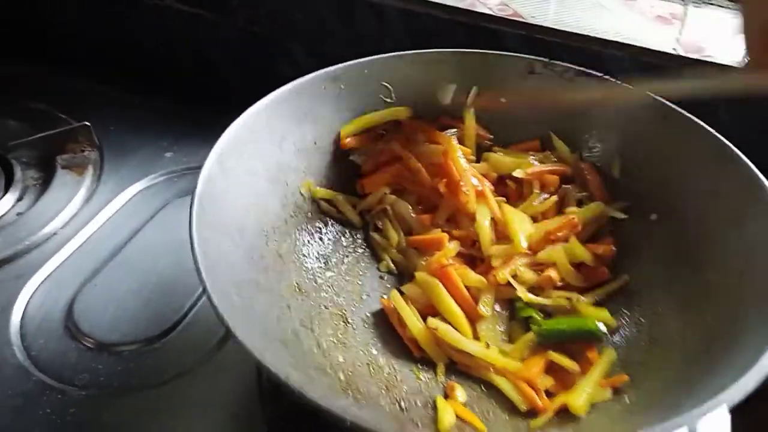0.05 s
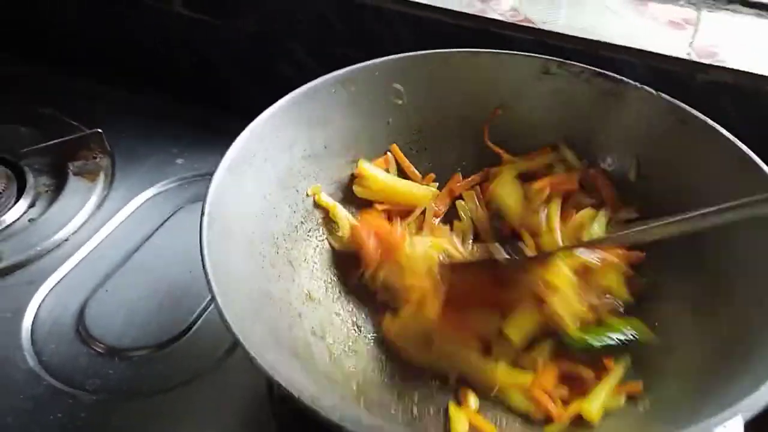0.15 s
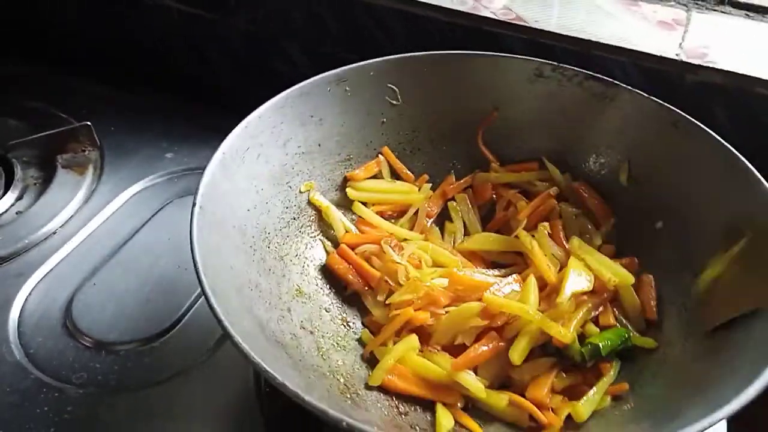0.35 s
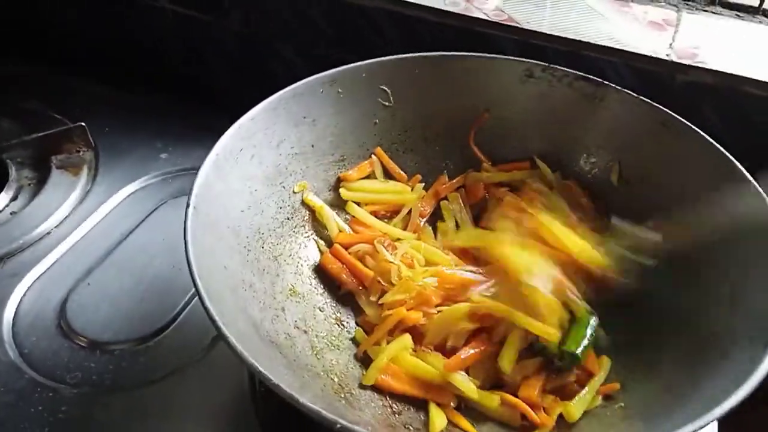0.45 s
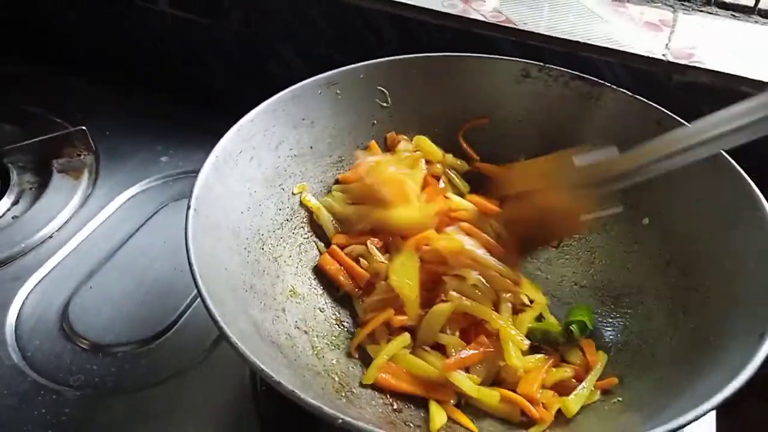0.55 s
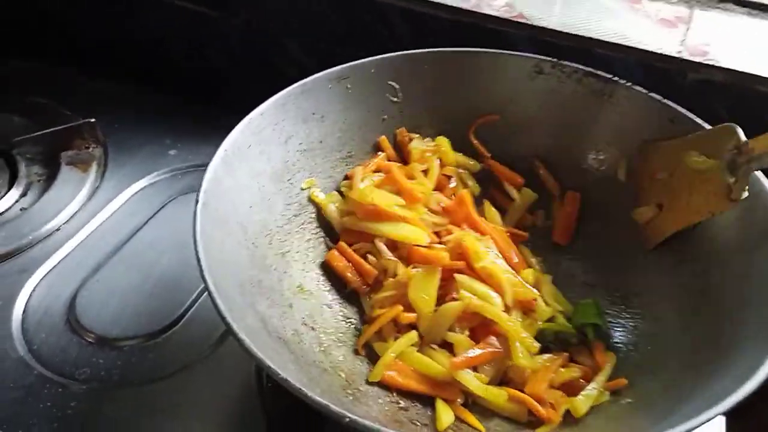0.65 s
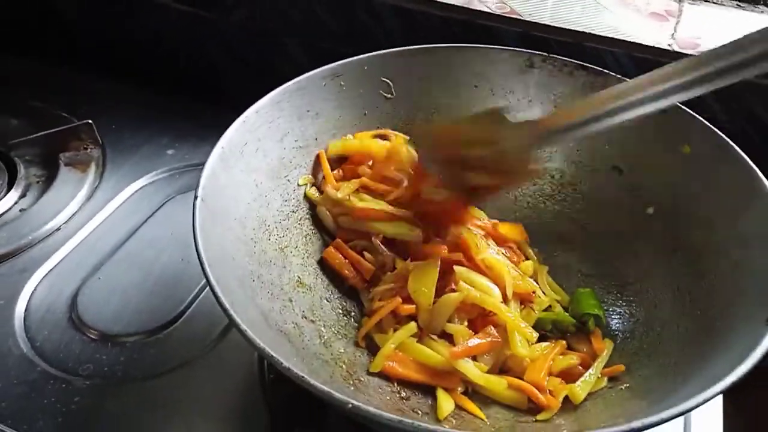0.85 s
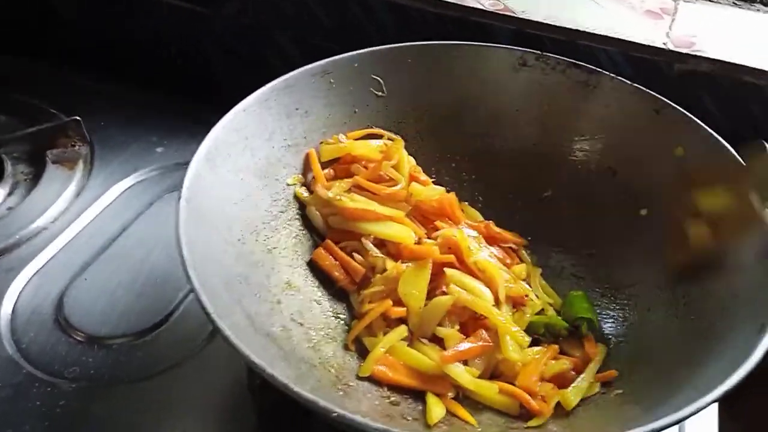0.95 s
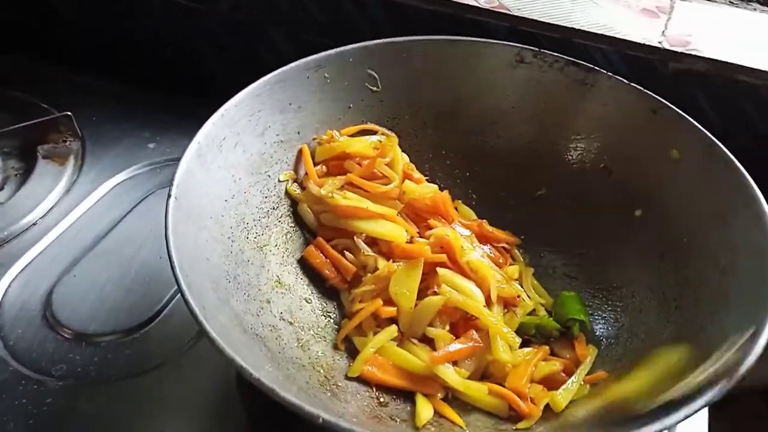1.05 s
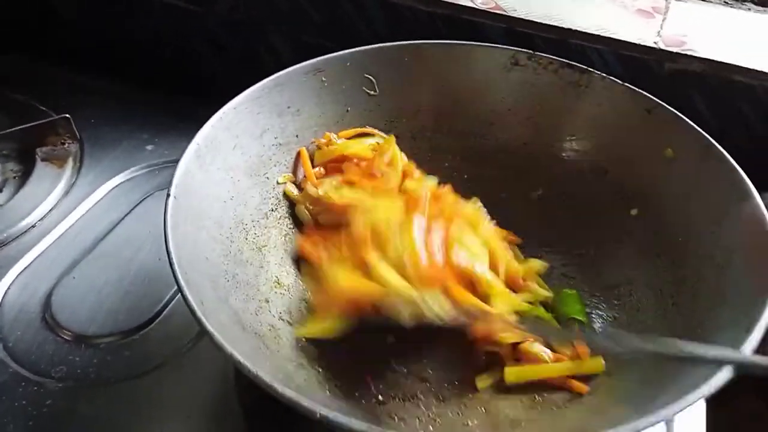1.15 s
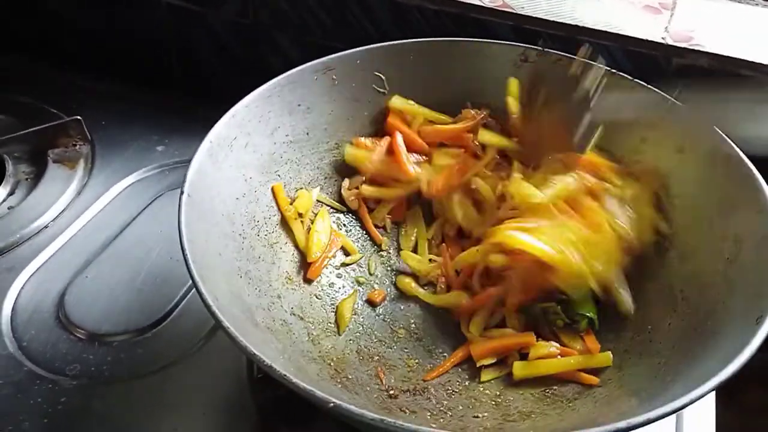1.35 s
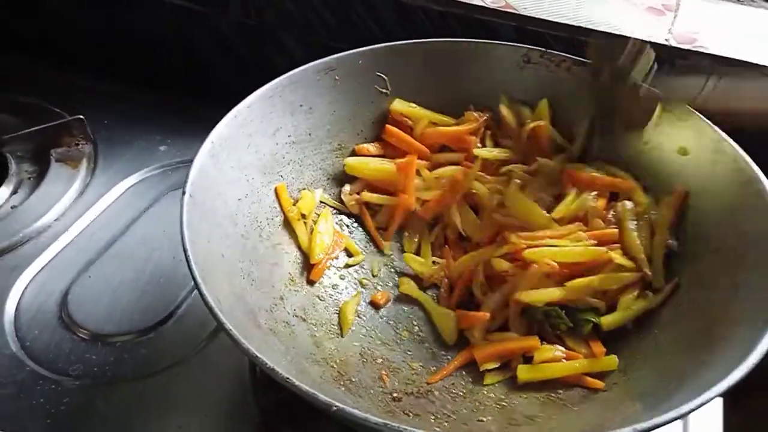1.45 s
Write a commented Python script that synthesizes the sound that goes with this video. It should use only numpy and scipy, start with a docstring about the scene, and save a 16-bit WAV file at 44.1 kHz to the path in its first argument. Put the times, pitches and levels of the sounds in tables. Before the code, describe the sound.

A steel spatula scrapes hard through vegetables in a metal wok, the pan rings briefly, then a sharp clink and a lighter second scrape follow over faint sizzling, close up in a small kitchen.

```python
"""A small kitchen, close to a wok: a steel spatula turns vegetables over a faint sizzle of oil.
Two scooping strokes scrape along the pan: grains of noise drive its body, a mid rasp and treble grit.
Each stroke opens with a metallic scritch. Light slides make the blade zing, taps clink and ring,
soft blows thud through the wok's resonances, and the uncovered pan sings in short damped notes."""
import sys
import numpy as np
from scipy import signal
from scipy.fft import rfft, irfft
from scipy.io import wavfile
from scipy.ndimage import map_coordinates

SR = 44100
rng = np.random.default_rng(int(sys.argv[2]) if len(sys.argv) > 2 else 0)


def transcribe(u):
    """Save the signal u as a 16-bit wav file named by the first command-line argument.

    u: samples, shape (n,) or (channels, n), limited to [-1, 1]; the rate is SR.
    q: integer samples, one column per channel.
    """
    v = np.clip(np.atleast_2d(u).T, -1, 1)
    q = np.round(v * 32767).astype(np.int16)
    wavfile.write(sys.argv[1], SR, q)


N = 66150  # samples, 1.5 s


def amp(db):
    """Decibels to linear gain."""
    return 10 ** (np.asarray(db) / 20)


def unit(x):
    """Scale a signal to rms 1."""
    return x / np.sqrt(np.mean(x ** 2) + 1e-20)


def clock():
    """The time of each sample in seconds."""
    return np.arange(N) / SR


def decay(t, t60):
    """Exponential fade that falls 60 dB in t60 seconds."""
    return np.exp(-np.log(1000) * t / t60)


def along(points, hz):
    """Interpolate (Hz, value) points on a log frequency axis."""
    point_hz, values = np.transpose(points)
    return np.interp(np.log(hz + 1), np.log(point_hz + 1), values)


def grid():
    """Frequencies of the filter grid in Hz."""
    return np.fft.rfftfreq(2 * N, 1 / SR)


def filtered(x, response):
    """Pass a zero-padded signal through a frequency response."""
    return irfft(rfft(x, 2 * N) * response, 2 * N)[..., :N]


def even(response):
    """Scale a response so that white noise keeps its power."""
    return response / np.sqrt(np.mean(np.abs(response) ** 2))


def colour(points):
    """Tone curve through (Hz, dB) points, made causal by folding its cepstrum (minimum phase)."""
    cepstrum = irfft(np.log(amp(along(points, grid()))))
    return even(np.exp(rfft(2 * cepstrum[:N], 2 * N) - cepstrum[0]))


def resonances(rows):
    """Sum of second-order resonances, each with a centre, a width and a peak level."""
    f = grid()
    total = 0
    for centre, width, db in rows:
        total = total + amp(db) * 1j * f * width / (centre * centre - f * f + 1j * f * width)
    return total


def grains(rate, spread_db):
    """Random tiny impulses, rate a second on average, of uneven size and either sign, rms 1."""
    struck = rng.random(N) < rate / SR
    sign = rng.choice([-1, 1], N)
    size = amp(spread_db * np.clip(rng.standard_normal(N), -2, 2))
    return unit(struck * sign * size)


def wobble(rate):
    """A smooth random curve with rate knots a second."""
    return map_coordinates(rng.standard_normal(1024), [clock() * rate], mode="wrap")


def burst(s, rise, t60):
    """Envelope with a Gaussian swell up to time s and an exponential fade after it."""
    t = clock() - s
    swell = np.exp(-(np.minimum(t, 0) / rise) ** 2)
    return swell * decay(np.maximum(t, 0), t60)


def ring(s, modes, attack):
    """Damped sines that start at time s, each level varied at random by about 1 dB."""
    t = np.maximum(clock() - s, 0)
    total = 0
    for hz, db, t60 in modes:
        total = total + amp(db + rng.normal()) * decay(t, t60) * np.sin(2 * np.pi * hz * t)
    return (1 - np.exp(-t / attack)) * total


def rubbed(modes, rough):
    """Modes kept sounding by friction; the wider one is, the faster it wavers in phase and level."""
    total = 0
    for hz, width, db in modes:
        level = amp(db + 2.5 * wobble(5 * width))
        phase = 2 * np.pi * (hz * clock() + rng.random()) + rough * wobble(5 * width)
        total = total + level * np.sin(phase)
    return unit(total)


# Resonances of the loaded wok. Each row: centre in Hz, width in Hz, peak level in dB.
WOK_RESONANCES = [(303.7, 30, -2), (323.5, 29, -7.5), (476.7, 24, -3), (762.4, 14, 7.5), (1087, 35, -8),
                  (1190, 28, -1.5), (1516, 33, -5.5), (1760, 61, 6), (2196, 34, -1.5), (2567, 68, 3.5),
                  (3900, 66, -19), (4850, 190, -10), (5310, 90, -7)]


def wok(spectrum, plain_db):
    """The pan's resonances over its plain response, under the colour of the contact."""
    return even(colour(spectrum) * (amp(plain_db) + resonances(WOK_RESONANCES)))


# Tone curves of the frying, of the low rush, and of a faint high hiss that differs between
# left and right. Each row: frequency in Hz, level in dB.
SIZZLE_COLOUR = [(600, -16), (1100, -24), (1600, -8), (2050, -1), (2700, -1), (3600, -2.5), (4450, -10.5),
                 (5400, -1.5), (7200, 3), (8600, -6), (11000, -8.5), (12200, -18.5), (13600, -25),
                 (15000, 2.5), (15800, -2)]
RUSH_COLOUR = [(25, -29), (60, -17.5), (110, -7), (190, -0.5), (250, -7), (310, -2.5), (480, -3),
               (650, -8.5), (1400, -10.5), (2200, -22)]
WIDE_HISS_COLOUR = [(3000, -44), (4000, -28), (4600, -15), (5500, -30), (8000, -30), (9500, -3),
                    (11000, 1.5), (13600, 0), (14600, -2), (15800, -4)]


def sizzle():
    """Bubbles burst in the oil, as pops over noise, with the low rush of stove and room and a wide hiss."""
    frying = unit(rng.standard_normal(N) + amp(-3) * grains(900, spread_db=5))
    flicker = amp(-54.5 + 1.45 * wobble(15.14))
    oil = flicker * filtered(frying, colour(SIZZLE_COLOUR))
    rush = amp(-61.5) * filtered(rng.standard_normal(N), colour(RUSH_COLOUR))
    centre = oil + rush
    # opposite sign in left and right
    wide_hiss = amp(-70.5) * filtered(rng.standard_normal(N), colour(WIDE_HISS_COLOUR))
    return np.array([centre + wide_hiss, centre - wide_hiss])


# How long the room rings. Each row: frequency in Hz, t60 in seconds.
ROOM_DECAY = [(200, 0.45), (2000, 0.23), (12000, 0.22)]


def kitchen(x):
    """The small room's short tail: noise that fades at its own rate in each band, 5 ms late."""
    hz, t, noise = signal.stft(rng.standard_normal(SR // 2), SR, nperseg=256)
    fade = decay(t, along(ROOM_DECAY, hz)[:, None])
    tail = signal.istft(noise * fade, SR)[1]
    delayed = np.pad(x, (SR // 200, 0))
    return signal.fftconvolve(delayed, tail / np.linalg.norm(tail))[:N]


# Notes of the pan as the food lifts. Each row: start in seconds, pitch in Hz, level in dB, t60 in seconds.
SUNG_NOTES = [(0.101, 184, -47.5, 0.14), (0.10, 872, -43, 0.053), (0.135, 1000, -55, 0.37),
              (0.418, 848.5, -36.5, 0.22), (0.422, 1098, -37.5, 0.18), (0.453, 1153, -39, 0.17),
              (0.512, 1251, -51, 0.22), (0.545, 790, -49, 0.31), (1.206, 1800, -38, .07)]


def pan_notes():
    """The uncovered pan sings briefly, each damped note smeared by the moving food."""
    out = np.zeros(N)
    for s, hz, db, t60 in SUNG_NOTES:
        note = ring(s, [(hz, db, t60)], attack=0.005)
        smear = 0.7 + 0.7 * wobble(75)
        out += note * smear
    return out


# Soft blows of blade and vegetables. Each row: peak in seconds, level in dB, t60 in seconds.
SOFT_BLOWS = [(0.098, -55.5, 0.42), (0.216, -29, 0.093), (0.2582, -33.5, 0.042), (0.689, -54, 0.59),
              (0.851, -50.5, 0.22), (1.006, -52.5, 0.42), (1.157, -40, 0.035), (1.236, -36.5, 0.084)]
# Tone curve of a soft blow. Each row: frequency in Hz, level in dB.
BLOW_COLOUR = [(40, -36.5), (150, -13.5), (290, 5.5), (450, -6), (800, -5.5), (1800, -14), (4000, -20),
               (10000, -35.5)]


def thuds():
    """Each soft blow is a dying cluster of contacts on the damped pan."""
    force = np.zeros(N)
    for s, db, t60 in SOFT_BLOWS:
        force += amp(db) * burst(s, rise=0.00053, t60=t60)
    return filtered(force * grains(3000, spread_db=0.5), wok(BLOW_COLOUR, plain_db=-4))


# Tone curve of the edge's hiss on steel, for taps and skims. Each row: frequency in Hz, level in dB.
EDGE_COLOUR = [(300, -7), (1500, -17), (3000, -0.5), (4300, -11.5), (5000, 0.5), (6000, 4), (8000, -3),
               (9500, -1), (10500, -7.5), (11700, -29), (13000, -8), (13700, -9), (14600, -1), (16000, -17)]
# Steel on steel. Each row: start in seconds, then clink, chatter and long ring levels in dB.
STEEL_TAPS = [(0.53, -46, -56.5, -54.5), (0.6791, -30, -54, -45), (1.0006, -25, -34.5, -60),
              (1.0132, -43, -43.5, -66), (1.10, -46, -51, -46.5), (1.478, -46.5, -58, -68)]
# The clink and the spatula's long ring. Each row: pitch in Hz, level in dB, t60 in seconds.
CLINK_MODES = [(3140, 0.5, 0.018), (2830, -6.5, 0.01), (3700, -34, 0.022), (5950, -18, 0.014)]
SPATULA_MODES = [(1426, -9.5, 0.28), (1974, -21, 0.72), (2686, -7, 0.59), (3406, -1, 0.22),
                 (4280, -12, 0.22)]
# Modes of the chatter. Each row: pitch in Hz, width in Hz, level in dB.
CHATTER_MODES = [(3280, 140, -2), (4820, 82, 2), (5900, 83, 8), (6400, 60, -7), (7760, 23, 5),
                 (8920, 37, 9.5), (9840, 51, 6.5), (10200, 47, -1), (12500, 51, 0), (14650, 130, -5)]
# Tone curve of the first instant of contact. Each row: frequency in Hz, level in dB.
CRACK_COLOUR = [(500, -33), (2500, -12), (5500, -7), (15000, -1)]


def taps():
    """A hard contact cracks and clinks, chatters briefly and leaves the spatula ringing."""
    rattling = amp(-3) * rubbed(CHATTER_MODES, rough=0.4)
    edge_hiss = amp(-0.5) * filtered(grains(10000, spread_db=5), colour(EDGE_COLOUR))
    chatter = rattling + edge_hiss
    crack = amp(-8) * unit(filtered(rng.standard_normal(N), colour(CRACK_COLOUR)))
    out = np.zeros(N)
    for s, clink_db, chatter_db, ring_db in STEEL_TAPS:
        out += amp(clink_db) * ring(s, CLINK_MODES, attack=0.00041)
        out += amp(ring_db) * ring(s, SPATULA_MODES, attack=0.0024) * amp(3 * wobble(120))
        rattle = burst(s, rise=0.00041, t60=0.075) * chatter
        snap = burst(s, rise=0.00032, t60=0.0045) * crack
        out += amp(chatter_db) * (rattle + snap)
    return out


# Light slides on the wok wall. Each row: peak in seconds, rise in seconds, t60 in seconds,
# then free blade ring, pressed blade ring and hiss levels in dB.
LIGHT_SLIDES = [(0.423, 0.0087, 0.12, -32.5, -54, -41.5), (0.814, 0.011, .12, -52, -41.5, -43)]
# Blade modes, free and pressed on the wall. Each row: pitch in Hz, width in Hz, level in dB.
FREE_BLADE = [(3403, 9.3, -13.5), (4260, 13, -13.5), (6140, 19.7, 0), (6600, 17, -10), (7060, 18, -4.5),
              (8935, 18, -9), (9570, 30, -9), (9840, 20, -6.5), (13300, 76, -18), (14620, 91, -10),
              (15200, 50, -16)]
PRESSED_BLADE = [(2682, 120, -9), (4820, 74, -3), (5510, 57, 9), (5680, 50, 3), (5600, 24, -20),
                 (6560, 14, 8), (7050, 23, 6.5), (7720, 70, 3), (8700, 51, -4), (8800, 50, -20),
                 (9040, 39, -19)]


def skims():
    """The edge slides lightly on bare steel: friction keeps the blade zinging over a grainy hiss."""
    out = np.zeros(N)
    for s, rise, t60, free_db, pressed_db, hiss_db in LIGHT_SLIDES:
        contact = burst(s, rise, t60)
        free = amp(free_db) * rubbed(FREE_BLADE, rough=0.85)
        pressed = amp(pressed_db) * rubbed(PRESSED_BLADE, rough=0.6)
        out += contact * (free + pressed)
        out += filtered(contact * grains(8000, spread_db=-1), amp(hiss_db) * colour(EDGE_COLOUR))
    return out


# The edge bites into the pan. Each row: peak in seconds, rise in seconds, t60 in seconds, level in dB.
EDGE_BITES = [(0.216, 0.008, 0.15, -36.5), (1.107, 0.015, 0.17, -39)]
# Resonances of the scritch. Each row: centre in Hz, width in Hz, peak level in dB.
SCRITCH_MODES = [(2153, 33, 2), (2708, 54, 2.5), (3670, 80, 1.5), (3805, 43, 5), (6390, 52, 7),
                 (6520, 57, 3), (6990, 58, 13), (7450, 49, 7.5), (7750, 31, 3), (8930, 23, 0),
                 (10000, 30, -19), (10800, 19, -23)]
# The scritch's treble roll-off. Each row: frequency in Hz, level in dB.
SCRITCH_COLOUR = [(1000, -8), (2000, 5.5), (8000, -1.5), (11000, -1.5), (12000, -13), (14000, -13)]


def bites():
    """Each stroke opens with a metallic scritch as grainy force sets resonances chattering."""
    force = np.zeros(N)
    for s, rise, t60, db in EDGE_BITES:
        force += amp(db) * burst(s, rise, t60)
    scritch = even(resonances(SCRITCH_MODES) * colour(SCRITCH_COLOUR))
    return filtered(force * grains(6000, spread_db=3), scritch)


# The two scooping strokes, a list of rows for each. Each row: time in seconds, then the levels in dB
# of the pan's low body, the mid rasp and the treble grit, before each layer's trim.
SCOOPS = [
    [(0.2, -94, -62, -77), (0.21, -32, -40, -36.5), (0.22, -37, -34, -31.5), (0.238, -40, -35, -38.5),
     (0.26, -29.5, -34, -41.5), (0.274, -38, -37, -47.5), (0.286, -37, -38, -40),
     (0.314, -33.5, -36.5, -39.5), (0.334, -37.5, -36, -46), (0.346, -35.5, -44.5, -38.5),
     (0.366, -34, -35, -44.5), (0.384, -39.5, -47.5, -53.5), (0.406, -43, -43.5, -50.5),
     (0.43, -48.5, -45.5, -46.5), (0.456, -53, -47.5, -55), (0.518, -60, -52.5, -52), (0.56, -54, -50, -59),
     (0.62, -59.5, -61, -54.5)],
    [(1.06, -54, -71, -74), (1.09, -64, -77, -60), (1.11, -56.5, -51.5, -45.5),
     (1.144, -57.5, -54.5, -51.5), (1.16, -40, -54, -51.5), (1.2, -71, -53, -58), (1.222, -57, -59.5, -53),
     (1.246, -70, -44, -60), (1.31, -56.5, -71, -91)],
]
# Tone curves of the three layers. Each row: frequency in Hz, level in dB.
BODY_COLOUR = [(25, -39), (50, -31), (75, -14), (120, -13.5), (220, -3.5), (300, -1.5), (480, -2.5),
               (650, -3.5), (850, -23), (2000, -47)]
RASP_COLOUR = [(300, -38.5), (600, -10.5), (750, 1.5), (1200, -1.5), (2700, -5), (3200, -8), (6000, -41)]
GRIT_COLOUR = [(1500, -29.5), (2800, -0.5), (3500, -3), (4200, -1), (4900, 0), (6000, 0), (7500, 0.5),
               (8100, -14), (10500, -16), (12000, -32.5), (15000, -14)]


def scrapes():
    """The blade sticks and slips along the pan; the slips drive its body, a rasp and fine grit."""
    levels = np.zeros((3, N))
    for rows in SCOOPS:
        times, *layers = np.transpose(rows)
        for i, layer_db in enumerate(layers):
            levels[i] += amp(np.interp(clock(), times, layer_db, left=-120, right=-120))
    body, rasp, grit = levels
    judder = amp(1.76 * wobble(160))  # shared by all three layers
    body_slips = amp(-3.5) * body * judder * grains(2500, spread_db=3)
    rasp_slips = amp(-3) * rasp * judder * grains(2500, spread_db=3)
    grit_slips = amp(-0.5) * grit * judder * grains(5000, spread_db=3)
    return (filtered(body_slips, wok(BODY_COLOUR, plain_db=-5.5))
            + filtered(rasp_slips, wok(RASP_COLOUR, plain_db=1.5))
            + filtered(grit_slips, wok(GRIT_COLOUR, plain_db=-4.5)))


def scene():
    """Spatula, wok and their room tail in the centre, with the centred sizzle and a faint wide hiss."""
    stirring = scrapes() + bites() + thuds() + skims() + pan_notes() + taps()
    return stirring + amp(-12) * kitchen(stirring) + sizzle()


def record(dry):
    """Nothing is kept above the band limit."""
    top_hz = 15820
    return filtered(dry, grid() < top_hz)


dry = scene()
out = record(dry)
transcribe(out)
```